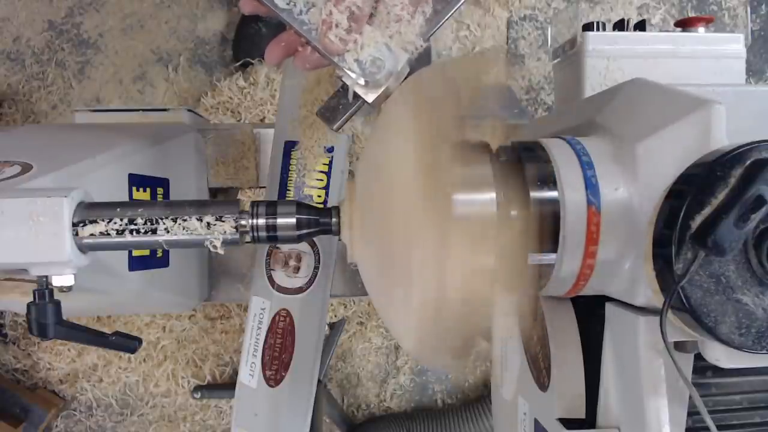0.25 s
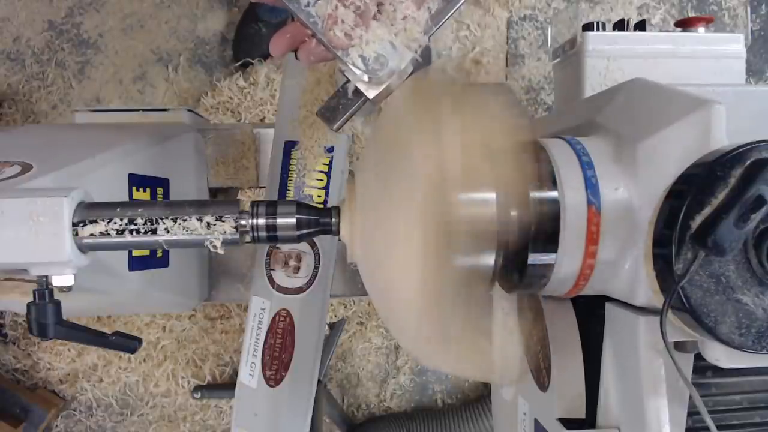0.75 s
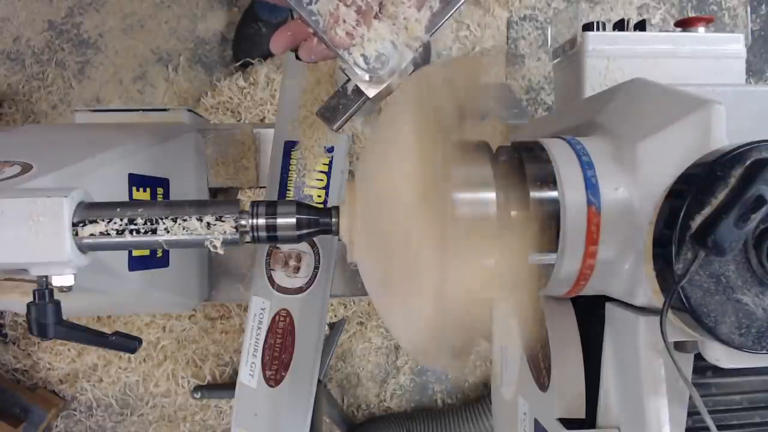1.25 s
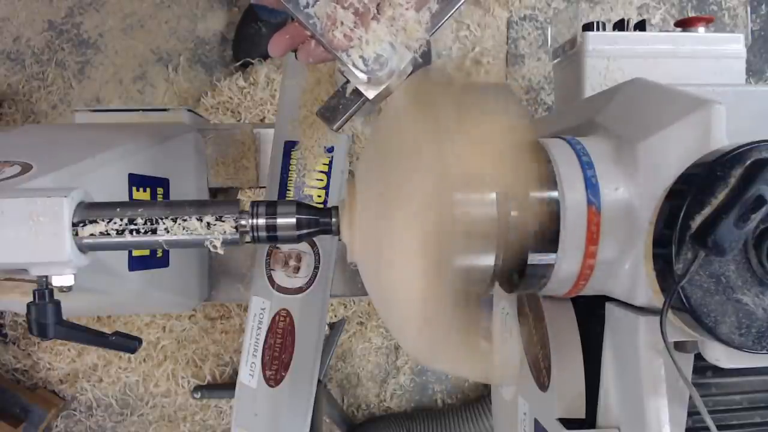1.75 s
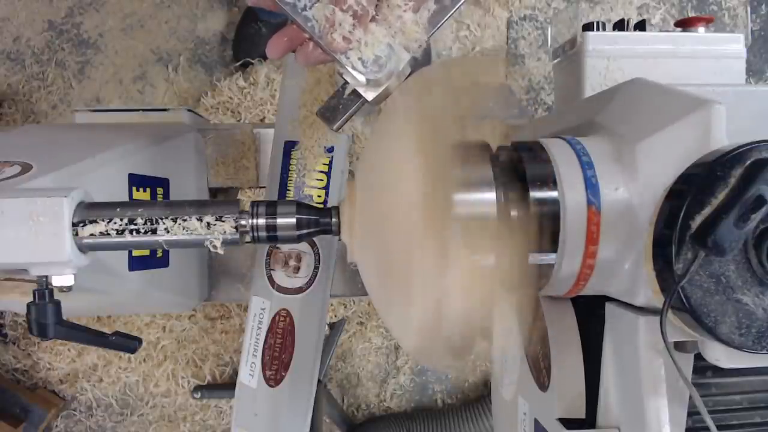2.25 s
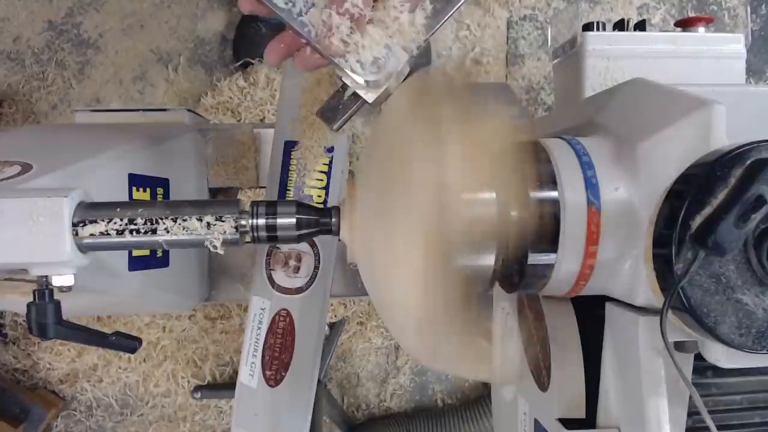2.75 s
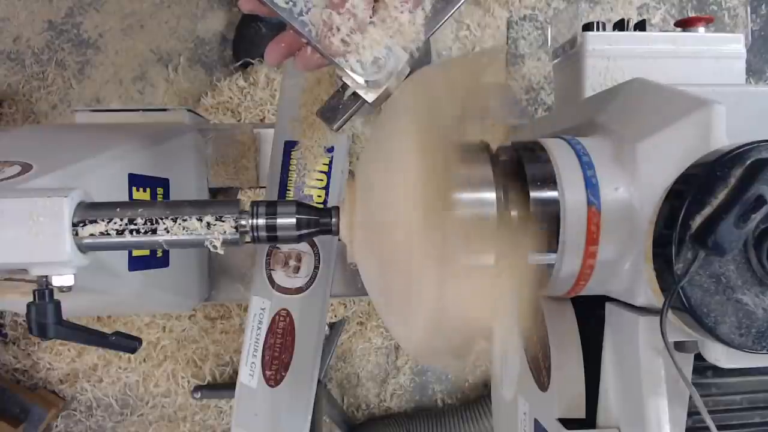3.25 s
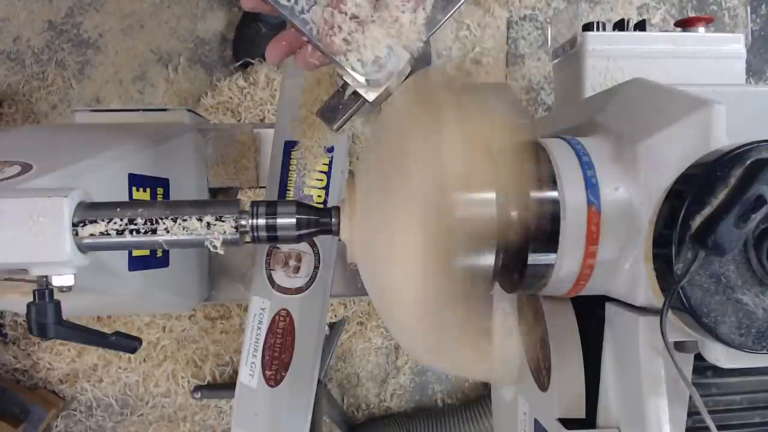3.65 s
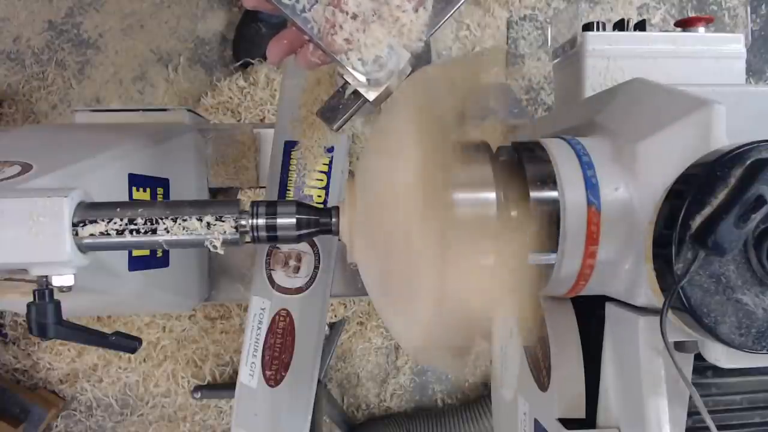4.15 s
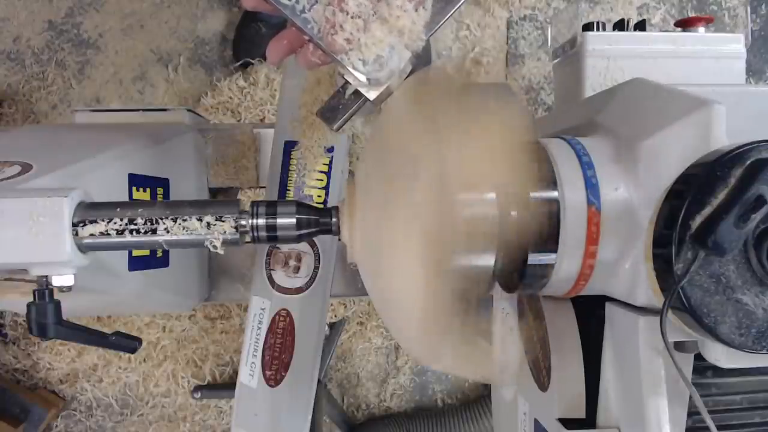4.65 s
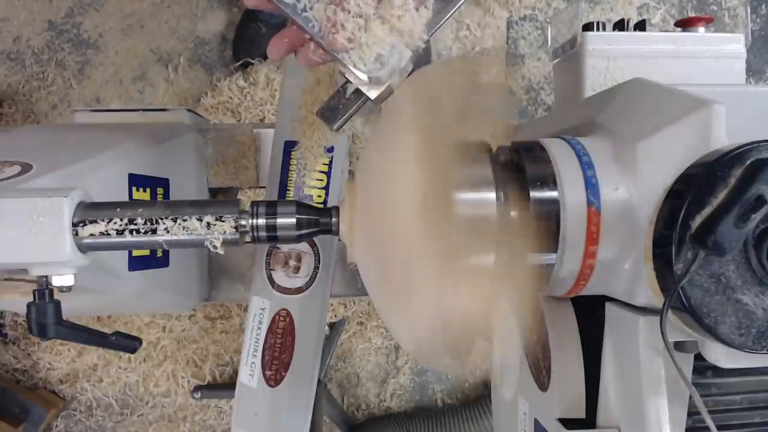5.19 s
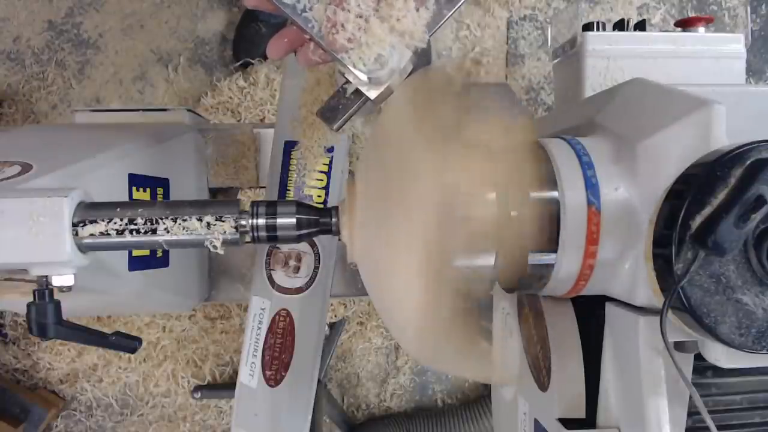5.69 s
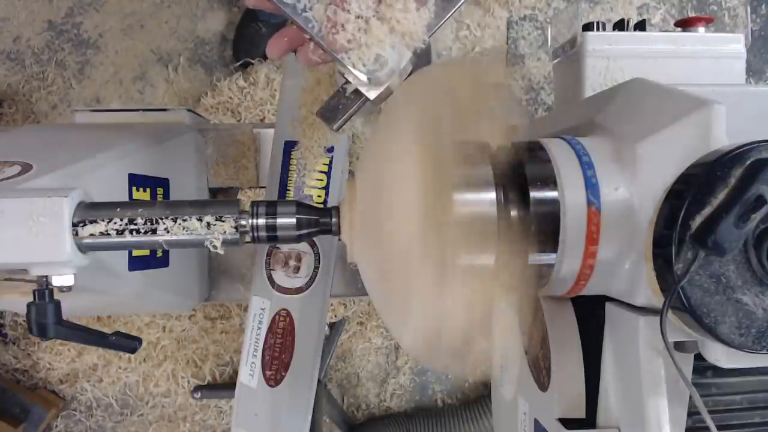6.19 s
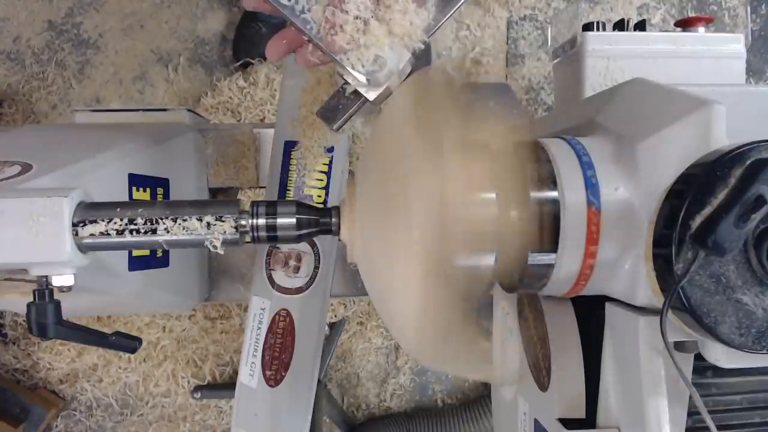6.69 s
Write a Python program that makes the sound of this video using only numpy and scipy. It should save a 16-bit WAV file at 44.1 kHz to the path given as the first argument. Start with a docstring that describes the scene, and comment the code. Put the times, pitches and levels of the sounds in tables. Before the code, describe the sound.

Heard up close in a small workshop, a wood lathe runs with a low rumble and thin motor whine while a scraper strikes a ridge on the spinning bowl at every turn. The rapid chatter mixes sharp knocks, gritty rasping and hollow wooden thumps, swelling and easing with the hand's pressure. At the end the chatter stops, and the edge catches the wood briefly once more as the machine keeps running.

```python
"""A hand-held scraper bounces on an out-of-round wooden bowl spinning on a lathe, in a small workshop.
The excitation is periodic: each turn drags the same high spots of grain under the edge, so the modes of
tool, rest and bowl knock and rasp, fibres tear, the bowl wall thumps and at times the blade squawks.
Near the end the tool lifts and grazes the wood again. The lathe's shake, rumble and drive whine run
throughout, a faint hum swells once, and the lathe bed and the room reflect the cut."""
import sys
import numpy as np
from scipy import signal
from scipy.fft import rfft, irfft
from scipy.io import wavfile

SR = 44100
rng = np.random.default_rng(int(sys.argv[2]) if len(sys.argv) > 2 else 0)


def store_pcm(level_fs):
    """Save levels as 16-bit WAV."""
    pcm = np.round(np.clip(level_fs, -1, 1) * 32767).astype(np.int16)
    wavfile.write(sys.argv[1], SR, np.atleast_2d(pcm).T)


N = 305613
TIME = np.arange(N) / SR
TURN_HZ = 14.47943
TURNS = np.arange(int(N / SR * TURN_HZ) + 2) / TURN_HZ  # when the bowl's ridge reaches the tool [s]


def amp(db):
    """Amplitude ratio of a level in decibels."""
    return 10 ** (np.asarray(db) / 20)


def unit(x):
    """Normalisation to rms 1."""
    return x / np.sqrt(np.mean(x ** 2) + 1e-20)


def curve(rows, t, column=1):
    """Linear interpolation of one table column at times t."""
    rows = np.asarray(rows)
    return np.interp(t, rows[:, 0], rows[:, column])


def shape(points, hz):
    """Spectral envelope: gain interpolated on a log-frequency axis."""
    f, db = np.transpose(points)
    return amp(np.interp(np.log(hz + 1), np.log(f), db))


def drift(hz):
    """Random modulation: low-pass noise of rms 1 and bandwidth hz."""
    f = np.fft.rfftfreq(N, 1 / SR)
    return unit(irfft(rfft(rng.standard_normal(N)) * np.exp(-(f / hz) ** 2), N))


def colour(x, gain, size=4096):
    """Minimum-phase filtering at unit energy, with magnitude proportional to gain(Hz)."""
    log_gain = np.log(gain(abs(np.fft.fftfreq(size, 1 / SR))) + 1e-6)
    taps = np.fft.ifft(np.exp(np.conj(signal.hilbert(log_gain)))).real[:size // 2]
    return signal.oaconvolve(x, taps / np.linalg.norm(taps))[:N]


def resonance(hz, centre, width):
    """Resonance: the power response of one mode."""
    return 1 / (1 + 2 * ((hz - centre) / width) ** 2) ** 2


def arch(t, start, end):
    """Sine-arch envelope, flattened so that it comes on fast, holds and lets go."""
    progress = np.clip((t - start) / (end - start), 0, 1)
    return np.maximum(np.sin(np.pi * progress), 0) ** 0.45


def contact(ms, rise_ms, length_ms):
    """Force pulse: a linear rise as the edge digs in, a Gaussian fall as it is thrown clear."""
    return np.clip(ms / rise_ms, 0, 1) * np.exp(-(ms / length_ms) ** 2)


def passing(bite, at_ms, rise_ms, length_ms):
    """Periodic forcing: one contact a turn, with bite holding its strength in each turn."""
    turn, fraction = np.divmod((TIME - at_ms / 1000) * TURN_HZ, 1)
    return bite[np.maximum(turn, 0).astype(int)] * contact(fraction / TURN_HZ * 1000, rise_ms, length_ms)


def lift(t, ease_s=6.4, clear_s=6.62, fade_db_per_s=31):
    """Unloading: the contact force falls as the tool is eased back, then ends as it leaves the wood."""
    return amp(-fade_db_per_s * np.maximum(t - ease_s, 0)) * np.clip((clear_s - t) / 0.015, 0, 1)


# Pushes of the hand: (start [s], end [s], depth [0-1], shaving force [dB], lead on the ridge [ms],
# tear ratio [dB]). A tear ratio weighs tearing fibres against the ringing of tool and bowl.
PUSHES = [(0.0, 0.703, 0.67, -26, 8.6, 4.5), (0.657, 1.016, 0, -24.5, 2.9, 9),
          (1.18, 1.61, 0, -28.5, 4, 17), (1.593, 1.964, 1, -28, 4.4, 10),
          (3.012, 3.658, 0.81, -28, 8.2, 0.5), (3.99, 4.297, 0.74, -30, 5.5, 2),
          (4.6, 4.92, 1, -32, 8.1, 8), (5.157, 5.513, 1.0, -25.5, 5.7, 6),
          (5.697, 5.984, 0.92, -45, 2.5, -2), (6.136, 6.5, 0.83, -32, 8.5, 3)]


def shaving():
    """Sliding friction: while pushed, the edge meets the wood early and drags up to the ridge."""
    for start, end, _, db, lead_ms, tear_db in PUSHES:
        yield passing(amp(db) * arch(TURNS, start, end), -lead_ms, rise_ms=3, length_ms=9), tear_db, 1


# The hand's hold on the tool: (time [s], slack [0-1], offset to every tear ratio [dB])
HOLD = [(0, 0, -0.5), (.62, 0.13, -4.5), (.78, .9, -2), (1.35, 1, -2), (1.78, 0.65, 1.5), (2.1, 1, 1),
        (2.58, 0, 0), (2.9, 0, 1.5), (3.45, 0, 3), (4.0, 0.03, 0.5), (4.45, 0.14, -1.5), (5.0, 0.13, -2.5),
        (5.3, 0.13, 1), (6.4, 0.15, 0.5)]
# The ridge's lip, crest, flank and heel, then the bowl's far side: (time into turn [ms], rise [ms],
# length [ms], force [dB], gain at full push [dB], loss when slack [dB], tear ratio [dB], drag [0-1])
HIGH_SPOTS = [(0.06, 0.99, 9.1, -32.5, -1, 8, 6, 0.04), (3.92, 1.3, 6, -32, 11, 16, -6.5, 0),
              (6, 3.83, 8.63, -17.5, -0.8, 22, 8.5, 0.7), (13.66, 0.57, 15.8, -38, 6, 13.5, -19.5, 0.81),
              (31, 5.3, 9.4, -33, 5, 11, -3.3, 0.84)]


def riding():
    """Intermittent contact: the edge rides the high spots, mostly deeper if pushed, lighter if slack."""
    push = sum(depth * arch(TURNS, start, end) for start, end, depth, *_ in PUSHES)
    slack = curve(HOLD, TURNS)
    for at_ms, rise_ms, length_ms, db, push_db, slack_db, tear_db, drag in HIGH_SPOTS:
        bite = amp(db + push_db * push - slack_db * slack) * lift(TURNS)
        yield passing(bite, at_ms, rise_ms, length_ms), tear_db, drag


def grain(kept, lumpy_db):
    """Quasi-periodic roughness: each turn meets the last turn's wood, with some of it cut away."""
    size, count = round(SR / TURN_HZ), len(TURNS)
    fibres = rng.standard_normal((count, size))
    for k in range(1, count):
        fibres[k] = kept * fibres[k - 1] + np.sqrt(1 - kept ** 2) * fibres[k]
    turn, fraction = np.divmod(TIME * TURN_HZ, 1)
    under_edge = fibres[turn.astype(int), (fraction * size).astype(int)]
    return unit(under_edge * amp(lumpy_db * drift(510)))


# Modes of tool, rest and bowl: (frequency [Hz], width [Hz], level struck [dB], level dragged [dB])
BODY_MODES = [(1114, 170, -3, 0.5), (1220, 60, -21, 2.5), (1545, 130, -4.5, 0.5), (1890, 180, 1.5, -10),
              (2294, 68, 0, 2.5), (2557, 240, 1, 1.5), (2770, 237, 1, -2), (3266, 168, 4.5, -4),
              (3830, 363, 4.5, -3.5), (4570, 320, 1.5, -11.5), (5290, 1430, -4.5, -41)]
# Spectral envelope over those modes: (frequency [Hz], relative level [dB])
BODY_SPECTRUM = [(100, -41.5), (280, -11.5), (520, 11), (800, -4.5), (1100, -2.5), (2100, -2.5),
                 (4600, -0.5), (7000, 2), (10000, 1), (16000, -18)]


def body(hz, dragged, floor_db=-14):
    """Modal superposition: the response of tool, rest and bowl, either struck or dragged."""
    power = sum(amp(levels[dragged]) ** 2 * resonance(hz, f, width) for f, width, *levels in BODY_MODES)
    return np.sqrt(power + amp(floor_db) ** 2) * shape(BODY_SPECTRUM, hz)


# Bright noise of tearing fibres: (frequency [Hz], relative level [dB])
TEAR_SPECTRUM = [(500, -44), (3000, -23), (5500, -17), (6700, -5), (7800, -0.5), (8900, 2), (9700, 1),
                 (10500, -8.5), (12000, -11.5), (12900, -20.5), (13450, -11), (14200, -42), (16000, -89)]


def scraper():
    """Source and filter: each contact's power divides into knock, rasp and tear, excited by the grain."""
    rubbing = (amp(-53.5) * lift(TIME), 0, 0.5)  # light contact all the way round
    hold_ratio = amp(curve(HOLD, TIME, column=2)) ** 2
    knock_power, rasp_power, tear_power = np.zeros((3, N))
    for force, tear_db, drag in [rubbing, *shaving(), *riding(), *bouncing(), *catching()]:
        tear_ratio = hold_ratio * amp(tear_db) ** 2
        ringing = force ** 2 / (1 + tear_ratio)
        knock_power += ringing * (1 - drag)
        rasp_power += ringing * drag
        tear_power += ringing * tear_ratio
    knock = colour(np.sqrt(knock_power) * grain(kept=0.62, lumpy_db=0.37), lambda hz: body(hz, False))
    rasp = colour(np.sqrt(rasp_power) * grain(kept=0.67, lumpy_db=2.5), lambda hz: body(hz, True))
    tear = colour(np.sqrt(tear_power) * grain(kept=0.62, lumpy_db=1), lambda hz: shape(TEAR_SPECTRUM, hz))
    return amp(1.36) * knock + amp(1.86) * rasp + amp(-2.5) * tear


# Swell of the cut's lowest ring: (time [s], gain [dB])
LOW_RING_GAIN = [(0.3, 0), (0.9, 1.5), (1.5, -3.5), (2.2, 1.5), (2.7, 0), (3.3, 3), (4.2, -3), (4.8, -3.5),
                 (5.5, 0)]


def vary_low_ring(cut, hz=1154, q=7.7):
    """Amplitude modulation of one band: the lowest ring of the cut comes and goes."""
    band = signal.lfilter(*signal.iirpeak(hz, q, SR), cut)
    return cut + (amp(curve(LOW_RING_GAIN, TIME)) - 1) * band


# Low modes of the bowl wall, which sag in pitch as the edge lets go: (frequency [Hz], sag [Hz/ms],
# time into turn [ms], rise [ms], length [ms], echo delay [ms], echo gain [dB])
WALL_MODES = [(440, 1.25, -4, 6, 18.2, 26.8, 0.5), (542.9, 1.84, 2, 11, 30.4, 46.4, -6.5)]
# Swing of the wall as the edge moves along it: (time [s], lower mode rms [dB], upper mode rms [dB])
WALL_LEVELS = [(0.1, -45.5, -41), (0.55, -51.5, -54.5), (1.0, -46, -49), (1.7, -44.5, -47.5),
               (2.2, -46.5, -61.5), (2.65, -50.5, -44), (3.15, -48.5, -47), (3.55, -48, -39.5),
               (4.8, -47, -43), (6.5, -46, -40)]


def bowl_wall(roughness=0.31, free_s=6.56, fade_db_per_s=133):
    """Impulse response: once a turn the high spots set the wall swinging; the shop echoes the thump."""
    blows = np.diff(np.floor(TIME * TURN_HZ), prepend=-1)
    ms, out = TIME[:SR // 5] * 1000, np.zeros(N)
    for k, (hz, sag, at_ms, rise_ms, length_ms, echo_ms, echo_db) in enumerate(WALL_MODES):
        def thump(age_ms):
            cycles = (hz - sag * age_ms / 2) * age_ms / 1000
            return contact(age_ms, rise_ms, length_ms) * np.exp(2j * np.pi * cycles)
        ring = signal.oaconvolve(blows, thump(ms) + amp(echo_db) * thump(ms - echo_ms))[:N]
        rough_ring = (ring * (1 + roughness * (drift(74) + 1j * drift(65)))).real
        delayed = np.interp(TIME - at_ms / 1000, TIME, rough_ring, left=0, right=0)
        out += amp(curve(WALL_LEVELS, TIME, column=k + 1)) * unit(delayed)
    return out * amp(-fade_db_per_s * np.maximum(TIME - free_s, 0))  # settles as the tool comes off


# Shake of the frame: (time [s], rms level [dB])
SHAKE_LEVELS = [(0, -43.5), (2.8, -44.5), (3.15, -38), (3.5, -44.5)]
# Noise of bearings and belt: (frequency [Hz], relative level [dB])
RUMBLE_SPECTRUM = [(24, -38), (45, -15), (110, -16), (200, -17), (350, -11.5), (750, -17.5), (1020, -15),
                   (4700, -35.5), (8500, -37), (10000, -43), (10800, -56), (16000, -82)]
# Tones of the motor drive: (frequency [Hz], rms level [dB])
WHINE_TONES = [(277, -58), (683, -61.5), (2519, -63.5), (9146, -62), (9717, -62), (9943, -61), (10056, -66),
               (10170, -57.5)]


def lathe():
    """Forced vibration: the frame shakes twice a turn, bearings and belt rumble, the drive whines."""
    phase = 2 * np.pi * 2 * TURN_HZ * TIME
    swing = np.sin(phase) * (1 + 0.12 * drift(5))
    swing += amp(-17) * np.sin(2 * phase) * (1 + 0.3 * drift(3))
    swing += amp(-8) * np.sin(phase / 2) * (1 + drift(0.33))  # the bowl's unbalance, once a turn
    shake = amp(curve(SHAKE_LEVELS, TIME)) * unit(swing)
    rumble = amp(-49) * colour(rng.standard_normal(N), lambda hz: shape(RUMBLE_SPECTRUM, hz))
    whine = sum(amp(db) * unit(np.sin(2 * np.pi * hz * TIME + 1.42 * drift(9.4)))
                for hz, db in WHINE_TONES)
    return shake + rumble + whine


def reflections(x, t60, delay_s, echoes_per_s=4000):
    """Reverberation: sparse echoes of random sign decay by 60 dB in t60 seconds."""
    t = TIME[:SR // 2]
    signs = rng.choice([-1., 1.], len(t))
    arrivals = (rng.random(len(t)) < echoes_per_s / SR) * (t > delay_s)
    taps = signs * arrivals * 10 ** (-3 * t / t60)
    return signal.oaconvolve(x, taps / np.linalg.norm(taps))[:N]


def moving_echoes(x, t60, delay_s, count=3, change_hz=0.442):
    """Time-varying paths: hands and tool move, so sets of near echoes cross-fade at constant power."""
    fades = [np.cos(np.pi * (change_hz * TIME + k / count)) ** 4 for k in range(count)]
    total = np.sqrt(sum(fade ** 2 for fade in fades))
    return sum(reflections(x * fade / total, t60, delay_s) for fade in fades)


# Spells of blade flexing: (peak time [s], peak force [dB], build-up [dB/s], fade [dB/s])
SQUAWKS = [(0.64, -21.5, 41, 450), (2.7, -31.5, 143, 35)]
# Bending modes of the blade: (frequency [Hz], width [Hz], relative level [dB])
BLADE_MODES = [(1557, 130, 4), (2280, 220, -5)]


def blade_chatter():
    """Bending resonance: coming off the ridge's flank, the blade flexes and gives a hollow squawk."""
    bite = sum(amp(db - np.maximum(build * (s - TURNS), fade * (TURNS - s)))
               for s, db, build, fade in SQUAWKS)
    force = passing(bite, at_ms=13.8, rise_ms=1.7, length_ms=8.5)

    def bending(hz):
        return np.sqrt(sum(amp(db) ** 2 * resonance(hz, f, width) for f, width, db in BLADE_MODES))
    return colour(force * grain(kept=0.5, lumpy_db=1), bending)


# Runs of hard landings:
# (start [s], end [s], first force [dB], last force [dB], time into turn [ms], tear ratio [dB])
BOUNCES = [(0.66, 1.0, -22.5, -16.5, 0.054, -6.5), (1.01, 1.21, -20.5, -17.5, 4, -3),
           (1.22, 2.5, -19, -35, 0.07, 1.5), (1.42, 1.97, -22, -20.5, 4, -3),
           (1.98, 2.6, -17, -18.5, 3.74, -1.5), (4.04, 4.3, -20, -25.5, 3.7, -3),
           (4.325, 4.528, -18.5, -27.5, 3.85, -0.5), (4.66, 5.45, -19.5, -22, 3.74, 0),
           (5.48, 5.7, -20.5, -20, 4.15, 0), (5.63, 5.91, -32, -22.5, 0.06, 2),
           (5.91, 6.53, -22.5, -28, 3, -4.5)]


def bouncing():
    """Repeated impact: the tool lands on the same spot each turn, then skids on through the grain."""
    for start, end, first_db, last_db, at_ms, tear_db in BOUNCES:
        bite = amp(np.interp(TURNS, [start, end], [first_db, last_db])) * (TURNS > start) * (TURNS < end)
        landing = passing(bite, at_ms, rise_ms=0.8, length_ms=4.25)
        skid = passing(amp(-14) * bite, at_ms, rise_ms=8.1, length_ms=16.3)
        yield landing, tear_db, 0.042  # force, tear ratio [dB], drag [0-1]
        yield skid, -6, 1


# Single catches of the edge: (time [s], force [dB], length [ms], tear ratio [dB], drag [0-1])
CATCHES = [(0.704, -25, 4, 5, 0.8), (2.038, -24, 4.1, -3, 0.4), (6.571, -18.5, 3.5, 10, 0.7),
           (6.7785, -16, 4.4, 6, 0.55), (6.805, -27.5, 6.3, -22, 1), (6.8533, -32.5, 11.5, -3.5, 0.96)]


def catching():
    """Transient excitation: each catch of the edge in the wood is one force pulse."""
    for s, db, length_ms, tear_db, drag in CATCHES:
        yield amp(db) * contact((TIME - s) * 1000, rise_ms=2, length_ms=length_ms), tear_db, drag


def hum(hz=147):
    """Modulated tone: a faint low hum with a wavering phase swells under the first bounces."""
    tone = unit(np.sin(2 * np.pi * hz * TIME + 0.5 * drift(8)))
    return amp(-59.5) * arch(TIME, start=0.8, end=1.36) * tone


def scene():
    """Superposition: the cut, its echoes off lathe bed and workshop, the wall, the machine and the hum."""
    cut = vary_low_ring(scraper()) + blade_chatter()
    near = amp(-10) * moving_echoes(cut, t60=0.071, delay_s=0.0015)
    far = amp(-13) * reflections(cut, t60=0.42, delay_s=0.0076)
    return (cut + near + far + bowl_wall() + lathe() + hum())[None]


def record(dry):
    """Band limiting: a linear-phase low-pass at 16.2 kHz."""
    taps = signal.firwin(401, 16200, window=("kaiser", 9), fs=SR)
    return signal.oaconvolve(dry, taps[None], "same")


dry = scene()
out = record(dry)
store_pcm(out)
```